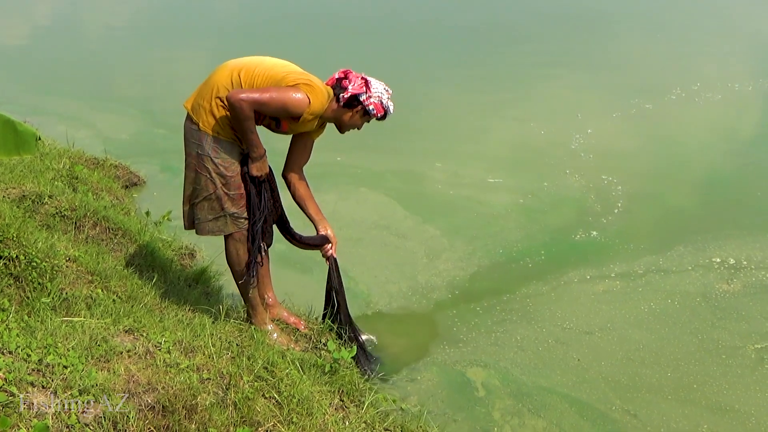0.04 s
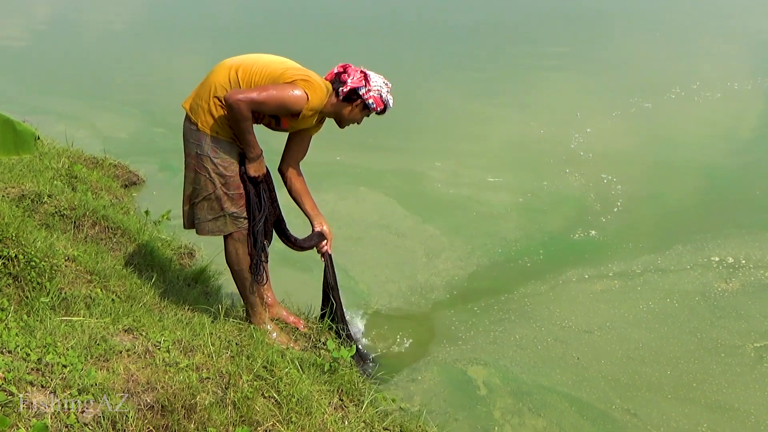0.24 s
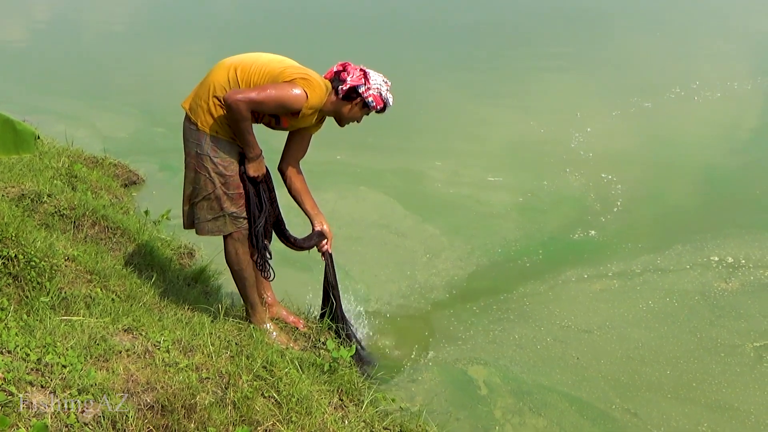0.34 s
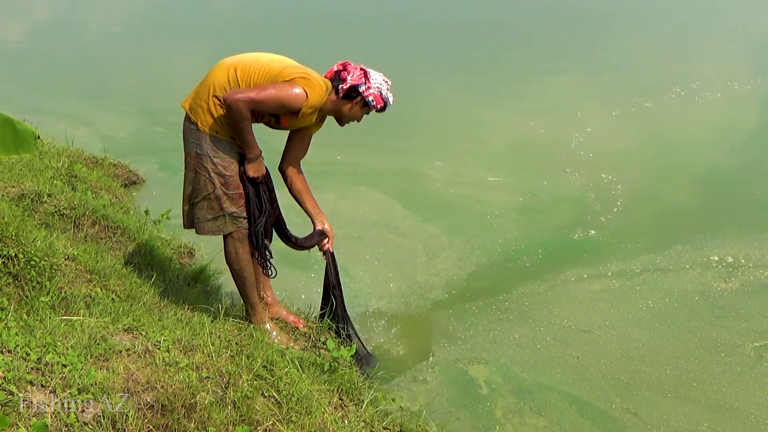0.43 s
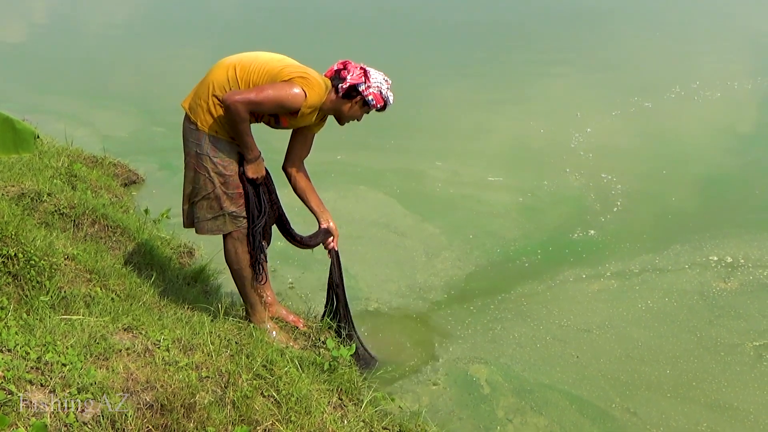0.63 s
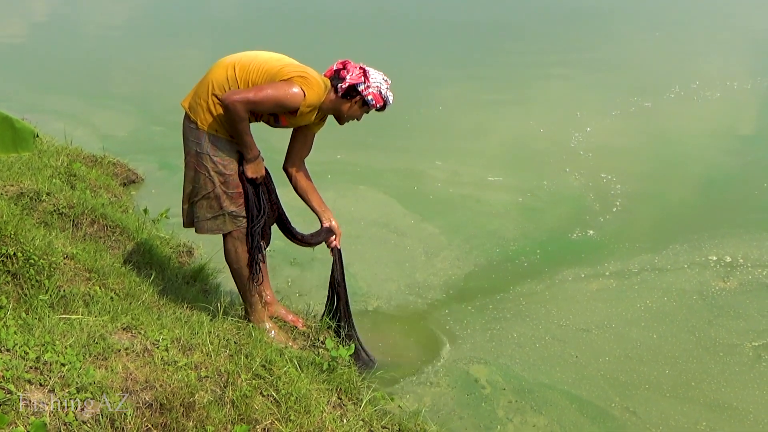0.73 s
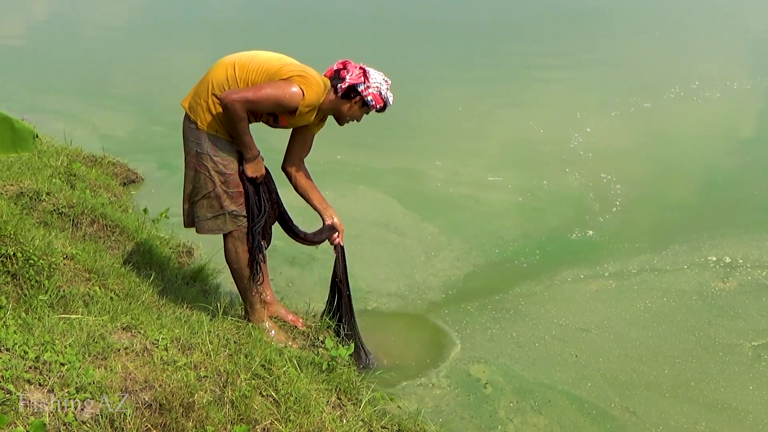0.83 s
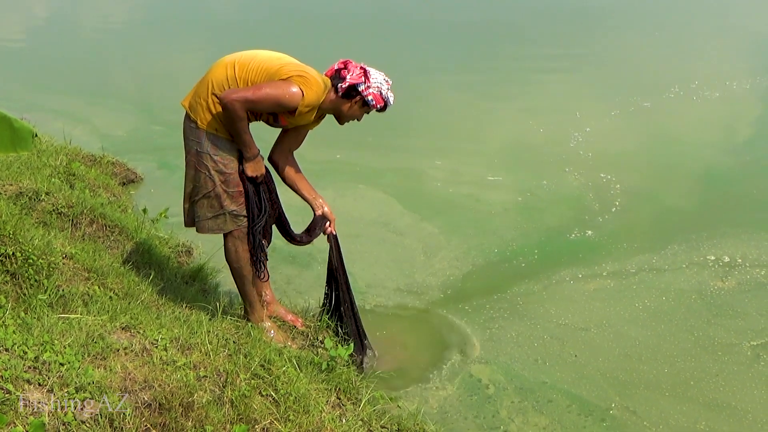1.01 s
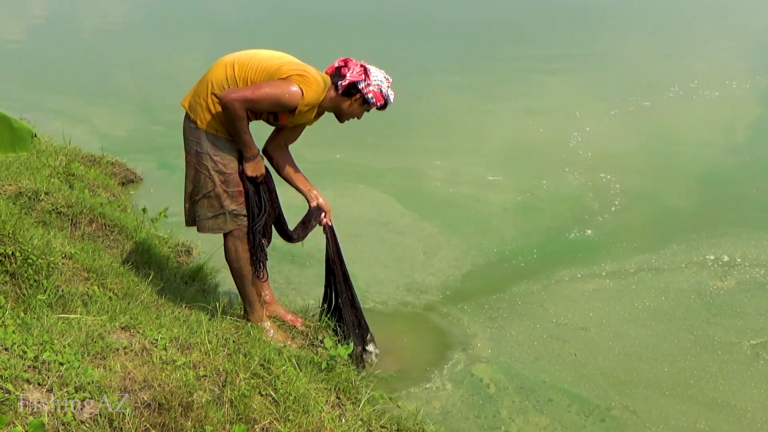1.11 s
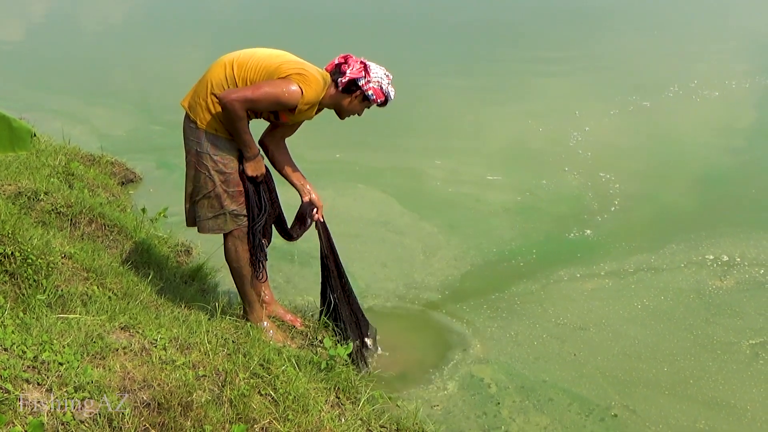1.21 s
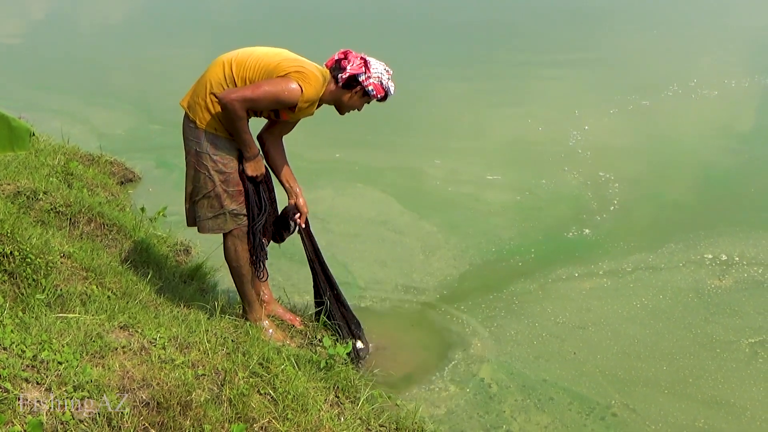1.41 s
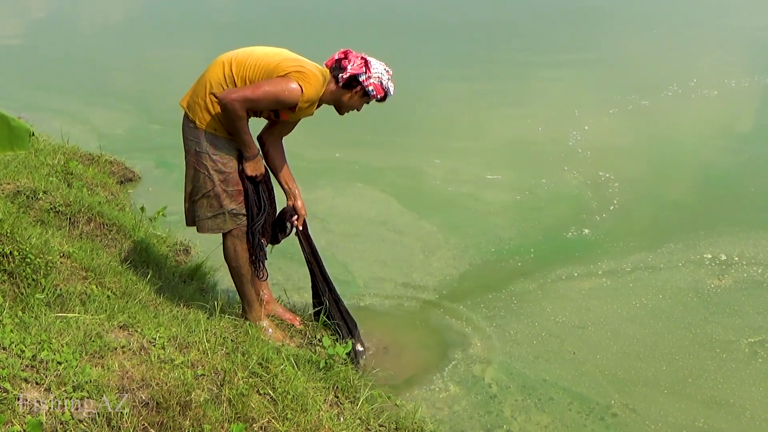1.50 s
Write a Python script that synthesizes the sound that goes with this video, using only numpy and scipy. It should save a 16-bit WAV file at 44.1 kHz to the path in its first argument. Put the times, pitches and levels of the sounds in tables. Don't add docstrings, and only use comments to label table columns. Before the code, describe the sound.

Net hauled from still water: sharp wet slap, gurgling splash, pattering drips, then a softer slosh

```python
import sys
import numpy as np
from scipy import signal
from scipy.io import wavfile
from scipy.ndimage import uniform_filter1d

SR = 44100
rng = np.random.default_rng(int(sys.argv[2]) if len(sys.argv) > 2 else 0)


def linear_from_db(decibels):
    return 10 ** (np.asarray(decibels, float) / 20)


def unload_audio(sound):
    columns = np.transpose(np.atleast_2d(sound))
    steps = np.round(np.clip(columns, -1, 1) * 32767)
    wavfile.write(sys.argv[1], SR, steps.astype(np.int16))


N = 68355


def read(points, hz):
    f, value = np.transpose(points)
    return np.interp(np.log(hz + 1), np.log(f + 1), value)


def evened(x):
    return x / np.sqrt(np.mean(x ** 2) + 1e-20)


def level(curve):
    s, db = np.transpose(curve)
    return linear_from_db(np.interp(np.arange(N) / SR, s, db))


def add(mix, start_s, sound):
    part = mix[round(start_s * SR):][:len(sound)]
    part += sound[:len(part)]


# frequency in Hz, likeness from 0 to 1.
AIR_LIKENESS = [(30, 0.99), (140, 1), (230, 0.81), (700, 0.19), (2000, 0.25), (8000, 0.94)]


def outdoor_noise(colour, rms_db, patchy_db):
    frames, hz = N // 256 + 5, np.fft.rfftfreq(1024, 1 / SR)
    a, b, c, d, patches = rng.standard_normal((frames, 513, 5)).T
    patches = evened(uniform_filter1d(uniform_filter1d(patches, 8, 0), 12, 1))
    same = np.clip(read(AIR_LIKENESS, hz), 0, 1)[:, None]
    mid = (a + 1j * b) * np.sqrt(1 + same)
    side = (c + 1j * d) * np.sqrt(1 - same)
    gain = linear_from_db(read(colour, hz)[:, None] + patchy_db * patches)
    spectrum = np.array([mid + side, mid - side]) * gain
    noise = signal.istft(spectrum, nperseg=1024, noverlap=768)[1][:, :N]
    return linear_from_db(rms_db) * evened(noise)


# frequency in Hz, density in dB per Hz.
HISS_COLOUR = [(180, -34), (300, -19), (701, -2), (1140, -2.5), (2280, -5.5), (3290, -7.5), (10400, -18),
               (16000, -24)]


def hiss():
    return outdoor_noise(HISS_COLOUR, rms_db=-52, patchy_db=2.0)


# frequency in Hz, density in dB per Hz.
RUMBLE_COLOUR = [(15, -35), (25, -36), (65, 5.5), (135, -6), (205, -2.5), (243, -8.5), (279, -9),
                 (461, -15), (700, -10.5), (910, -43), (1540, -120)]


def rumble():
    return outdoor_noise(RUMBLE_COLOUR, rms_db=-49, patchy_db=1.0)


def bubble(hz, cycles, rise, size, soft=1.04):
    turns = np.arange(size) / SR * hz
    swell = 1 - np.exp(-(turns / soft) ** 2)
    decay = linear_from_db(-60 * turns / (2.12 * cycles))
    x = swell * decay * np.sin(2 * np.pi * turns * (1 + rise * turns / cycles))
    return x / abs(x).max(axis=-1, keepdims=True)


def grains(colour, cycles, lo_hz, hi_hz, count, size):
    spread_db, clump_db, width = 2, 3, 0.065 * 3.9
    clump = evened(uniform_filter1d(uniform_filter1d(rng.standard_normal(N), 160), 160))
    when, pitch, ring, big, place = rng.random((count, 5)).T
    at = (when * N).astype(int)
    hz = lo_hz * (hi_hz / lo_hz) ** pitch
    taps = bubble(hz[:, None], cycles * (0.86 + ring[:, None]), rise=0.18, size=size)
    taps *= np.hanning(2 * size)[size:]
    gain_db = read(colour, hz) - spread_db * np.log(big + 0.023) + clump_db * clump[at]
    gain = linear_from_db(gain_db) * np.sqrt(hz)
    taps *= (gain / np.linalg.norm(taps, axis=1))[:, None]
    spots = (at[:, None] + np.arange(size)).ravel()
    channels = []
    for sign in (1, -1):
        pan = 1 + sign * width * (place - .5)
        channels.append(np.bincount(spots, (taps * pan[:, None]).ravel(), N + size)[:N])
    return evened(np.array(channels))


# time in seconds, froth level in dB.
CHURN_LEVEL = [(0, -64), (.2, -55), (.225, -50), (.3, -46), (.33, -33.5), (.42, -34), (.52, -40.5),
               (.6, -42), (.65, -58), (1.06, -63), (1.11, -53.5), (1.145, -38.5), (1.23, -42),
               (1.28, -47.5), (1.55, -49.5)]
# frequency in Hz, density in dB per Hz.
FROTH_COLOUR = [(180, -42), (300, -7.5), (609, -12.5), (1650, -5), (3090, -12.5), (4470, -10.5),
                (6680, -23), (10300, -19.5), (14000, -48)]


def froth():
    return level(CHURN_LEVEL) * grains(FROTH_COLOUR, 9.5, 363, 13720, count=6000, size=300)


# time in seconds, spray level in dB.
DRAIN_LEVEL = [(0, -60), (.19, -50.5), (.225, -45), (.3, -47), (.33, -32), (.41, -38), (.5, -45.5),
               (.75, -44), (.97, -43.5), (1.05, -42.5), (1.15, -41.5), (1.23, -43.5), (1.3, -43),
               (1.42, -52), (1.55, -55)]
# frequency in Hz, density in dB per Hz.
SPRAY_COLOUR = [(1470, -37), (2500, -2), (3920, -9.5), (4210, -0.5), (5110, -7), (8460, 4), (10600, -2.5),
                (16000, -35)]


def spray():
    return level(DRAIN_LEVEL) * grains(SPRAY_COLOUR, 7.5, 2600, 14130, count=12000, size=100)


def burst(hz, width_hz, t60_s, noise):
    t = np.arange(len(noise)) / SR
    r = np.exp(-np.pi * width_hz / SR)
    smooth = signal.lfilter([1], [1, -2 * r, r * r], noise[:, 0] + 1j * noise[:, 1])
    x = (np.exp(2j * np.pi * hz * t) * smooth).real
    x = x * (1 - np.exp(-(t / 0.00034) ** 2)) * linear_from_db(-60 * t / t60_s)
    return x / abs(x).max()


# centre time in
# seconds, peak in dB, centre in Hz, upward sweep in kHz per ms.
DROP_TICKS = [(0.0577, -41, 10290.0, 0.5), (0.0979, -43.5, 4150.0, 0.5), (0.1309, -38.5, 3200.0, 0.5),
              (0.1351, -32.5, 4430.0, 3.0), (0.149, -37, 10290.0, 0.5), (0.1687, -38.5, 3890.0, 0.5),
              (0.3281, -22, 4720.0, 2.0), (0.333, -35, 5740.0, 4.5), (0.335, -24.5, 9040.0, 0.5),
              (0.3444, -35, 6970.0, 9.0), (0.3556, -26, 4150.0, 3.0), (0.3575, -23, 10980.0, 3.0),
              (0.3596, -33, 8470.0, 0.5), (0.3876, -23.5, 3200.0, 1.0), (0.3933, -29, 3200.0, 0.5),
              (0.3996, -22, 9640.0, 0.5), (0.4734, -26, 7440.0, 6.5), (0.5243, -34, 3890.0, 0.5),
              (0.5296, -27, 3410.0, 2.0), (0.5532, -33, 4720.0, 4.5), (0.5764, -32.5, 4150.0, 1.0),
              (0.6354, -31, 5380.0, 4.5), (0.6714, -31, 9640.0, 0.5), (0.7003, -30, 6530.0, 6.5),
              (0.7083, -29, 8470.0, 9.0), (0.7362, -34, 7440.0, 2.0), (0.7526, -32, 7440.0, 3.0),
              (0.76, -37, 9640.0, 4.5), (0.8002, -38, 9640.0, 0.5), (0.8029, -28.5, 8470.0, 0.5),
              (0.8757, -42, 9640.0, 6.5), (0.8852, -35.5, 5040.0, 2.0), (0.8938, -31, 6530.0, 9.0),
              (0.903, -29.5, 10290.0, 3.0), (0.92, -37, 8950, 0.46), (0.9666, -27.5, 8990, 4),
               (0.97, -28, 8940, 1.6), (0.9788, -28, 7940.0, 4.5), (0.9814, -28.5, 5300, 2.3),
               (0.994, -26, 6900, 2.0), (1.0146, -32, 9600, 6.5), (1.0173, -31, 8470.0, 3.0),
               (1.0262, -27, 10200, 7.3), (1.0402, -33.5, 3190, 0.5), (1.0767, -29, 9800, 6.5),
               (1.1331, -28, 7440.0, 4.5), (1.142, -31, 4430.0, 1.0), (1.1442, -31, 7940.0, 6),
               (1.1457, -29.5, 5030, 2.0), (1.1495, -26, 9600, 6.5), (1.1663, -30, 7940.0, 2.3),
               (1.1682, -31, 9600, 6.8), (1.179, -21, 8500, 8.6), (1.1872, -30, 9040.0, 3.0),
               (1.204, -28, 10980.0, 1.0), (1.2529, -29, 10400, 9.0), (1.2675, -17.5, 9640.0, 4.47),
               (1.2898, -29, 10290.0, 8.2), (1.292, -35, 9040.0, 2.0), (1.2939, -16.5, 8500, 4.5),
               (1.297, -17, 9680, 4.2), (1.3236, -22, 11000, 9.0), (1.3665, -33.5, 4150.0, 2.0),
               (1.37, -30.5, 9040.0, 3.0), (1.3945, -24.5, 9670, 6.5), (1.4523, -38.5, 6970.0, 6.9),
               (1.49, -38.5, 3640.0, 0.5), (1.5283, -36.5, 7380, 4.5)]
SHARP_TICKS = [
    (.2086, -29, 7150, 2.9),
    (0.2171, -8, 9740, .6),
    (.2192, -9, 4733, 0.98),
    (1.393, -30, 11400, 6.6),
]


def ticks():
    width_s, shrink, max_lead = 0.00033, 0.16, 1.43
    out, t = np.zeros(N), np.arange(-200, 200) / SR
    rows = DROP_TICKS + SHARP_TICKS
    noises = rng.standard_normal((len(rows), 600, 2))
    for (s, db, hz, sweep), noise in zip(rows, noises):
        pitch = np.clip(hz + 1e6 * sweep * t, 1500, 17000)
        lead = np.where(t < 0, np.clip(sweep / 3, 1, max_lead), 1)
        shape = 1 / np.cosh(t * sweep ** shrink / width_s / lead)
        add(out, s + t[0], linear_from_db(db + 2.5) * shape * np.sin(2 * np.pi * np.cumsum(pitch) / SR))
        add(out, s, linear_from_db(db - 9) * burst(hz, 0.4 * hz, 0.015, noise))
    return out


# start in seconds, peak in dB, pitch in Hz, ring in cycles.
NET_BUBBLES = [(0.109, -27.5, 1060, 6.4), (0.274, -37, 1750, 8.5), (0.316, -26.5, 1046, 7.4),
               (0.322, -23, 1300, 4), (0.332, -22, 1616, 7.7), (0.352, -21.5, 2420, 4.2),
               (0.355, -19.5, 2300, 4.8), (0.367, -26, 1290, 6), (0.378, -31, 1800, 5),
               (0.3866, -1, 1760, 4.23), (0.408, -27.5, 1300, 8.3), (0.423, -29, 1630, 6.8),
               (0.434, -27, 1750, 6), (0.439, -18.5, 1990, 7.4), (0.444, -25, 1600, 7),
               (0.4616, -22.5, 1180, 4.3), (0.466, -24, 1680, 8.1), (0.466, -27, 2700, 8.5),
               (0.493, -30.5, 1740, 12), (0.503, -25.5, 1500, 4.2), (0.511, -29, 1990, 6),
               (0.574, -33.5, 1380, 6), (0.595, -28.5, 1330, 3.8),
               (0.788, -33, 2670, 4.3), (0.801, -31.5, 2510, 5.4), (1.117, -29, 2080, 9.9),
                  (1.125, -31.5, 2320, 6.5), (1.127, -37.5, 1420, 9.1), (1.14, -33, 960, 5.6),
                  (1.147, -34, 1320, 7.6), (1.153, -37, 1110, 6.6), (1.164, -27.5, 1860, 8),
                  (1.182, -30, 1820, 10), (1.216, -33.5, 1590, 11), (1.235, -32, 890, 4.3),
                  (1.244, -42, 1350, 6.3), (1.258, -32.5, 1260, 4.8), (1.263, -33, 1620, 8.3),
                  (1.35, -40.5, 2030, 20), (1.365, -33.5, 1950, 3), (1.451, -35.5, 2150, 4.4),
                  (1.479, -38.5, 2040, 11)]
# start in seconds, peak in dB, start pitch in Hz, rise in Hz per s, t60 in s.
DRIP_BUBBLES = [
    (0.065, -34, 1304, 21003, 0.053),
    (0.3592, -22, 1570, -50000, 0.025),
    (0.396, -36, 210.2, -900, 0.37),
    (0.5269, -12.5, 750, 120000, .014),
    (0.539, -22, 1798, 40000, 0.016),
    (0.595, -27.5, 2084, -25000, 0.045),
    (.621, -26, 1760, -30000, 0.023),
    (0.8138, -37.5, 2020, 200000, 0.039),
    (1.094, -36, 726, 17000, .08),
    (1.107, -38.5, 950, 60000, .06),
]


def bubbles():
    out, t = np.zeros(N), np.arange(5000) / SR
    for s, db, hz, cycles in NET_BUBBLES:
        add(out, s, linear_from_db(db) * bubble(hz, cycles, rise=0.03, size=1200, soft=.27 * cycles))
    for s, db, hz, rise, t60 in DRIP_BUBBLES:
        swell = 1 - np.exp(-(t * hz / 1.22) ** 2)
        fade = np.clip((0.55 * t60 - t) * hz / 6 + 1, 0, 1)
        tone = np.sin(2 * np.pi * (hz * t + .5 * rise * t ** 2))
        add(out, s, swell * fade * linear_from_db(db - 60 * t / t60) * tone)
    return out


# start in seconds, peak in dB, centre in Hz, width in Hz, t60 in seconds.
SLAP_BURSTS = [
    (.1970, -26, 4020, 1490, 0.013),
    (0.1967, -24, 9050, 2500, 0.0088),
    (.2130, -21.5, 3185, 5100, 0.045),
    (.2150, -18, 1696, 1590, 0.019),
    (.2168, -17.5, 3120, 1820, 0.012),
    (0.2161, -9, 6270, 3500, 0.017),
    (0.2187, -12, 12370, 4000, 0.012),
    (0.2162, -25, 6090, 9000, 0.096),
    (.2187, -13.5, 1613, 1570, 0.011),
    (.2280, -27.5, 2050, 400, 0.047),
]


def slap():
    out = np.zeros(N)
    noises = rng.standard_normal((len(SLAP_BURSTS), 4000, 2))
    for (s, db, hz, width_hz, t60_s), noise in zip(SLAP_BURSTS, noises):
        add(out, s, linear_from_db(db) * burst(hz, width_hz, t60_s, noise))
    return signal.lfilter(*signal.butter(2, [278, 13000], "band", fs=SR), out)


def bank(x):
    echo_s, echo_db, scatter_db, t60_s = .0032, -18.5, -16, .05
    t = np.arange(4000) / SR
    sparse = rng.standard_normal((2, 4000)) * (rng.random((2, 4000)) < .05)
    tail = sparse * linear_from_db(-60 * t / t60_s) * (t > .001)
    tail = tail + 1.1 * tail[::-1].mean(0)
    tail = linear_from_db(scatter_db) * tail / np.linalg.norm(tail[0])
    tail[:, 0] = 1
    tail[:, round(echo_s * SR)] += linear_from_db(echo_db)
    return signal.fftconvolve(x[None], tail, axes=1)[:, :N]


def scene():
    lean_db = np.linspace(0.3, 0.5, N)
    lean = linear_from_db(lean_db * np.array([[1], [-1]]))
    dripping = lean * (spray() + bank(ticks() + slap()))
    return hiss() + rumble() + froth() + dripping + bank(bubbles())


def top_cut(x):
    return signal.sosfilt(signal.butter(12, 16650, fs=SR, output="sos"), x)


def record(dry):
    mix = signal.oaconvolve(dry, signal.firwin(255, 16400, fs=SR)[None], "same")
    return top_cut(mix)


dry = scene()
out = record(dry)
unload_audio(out)
```